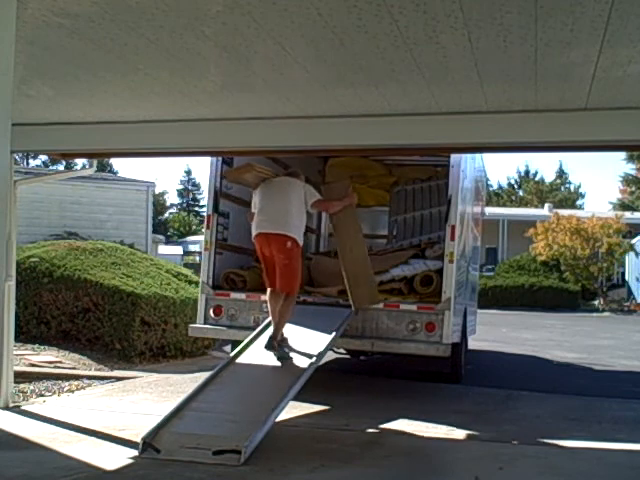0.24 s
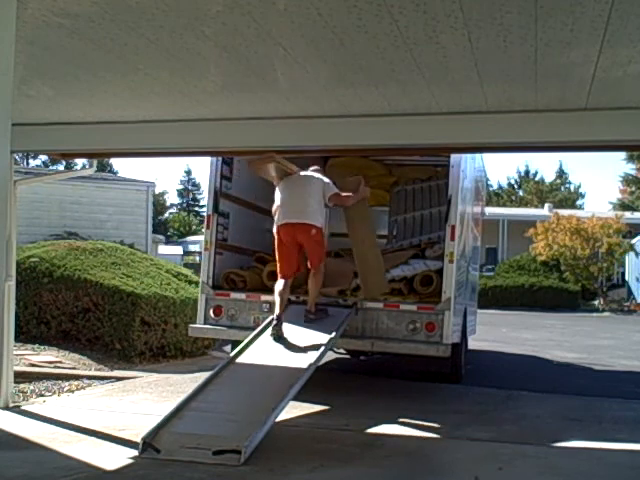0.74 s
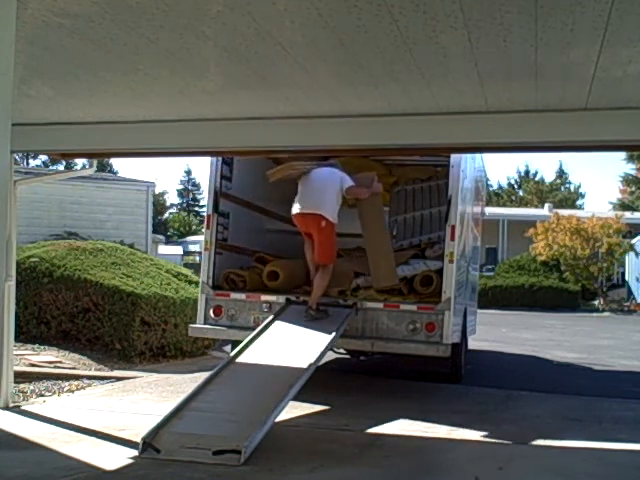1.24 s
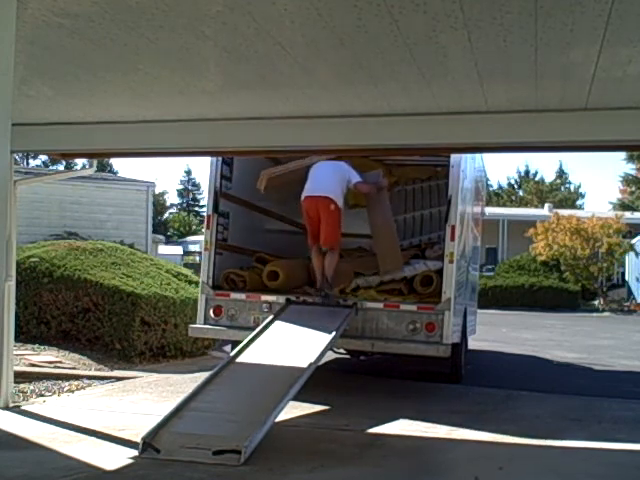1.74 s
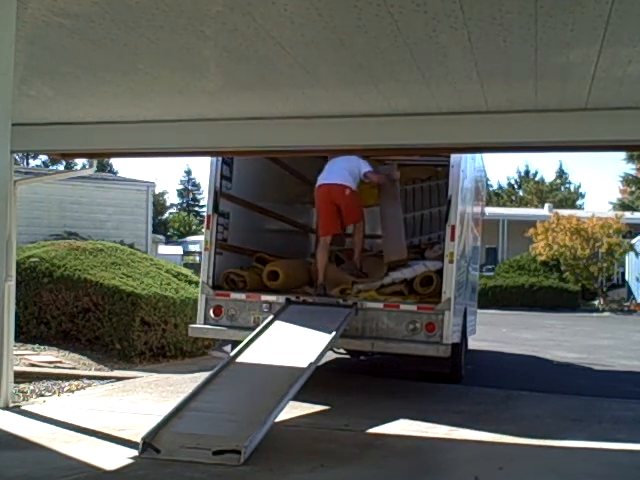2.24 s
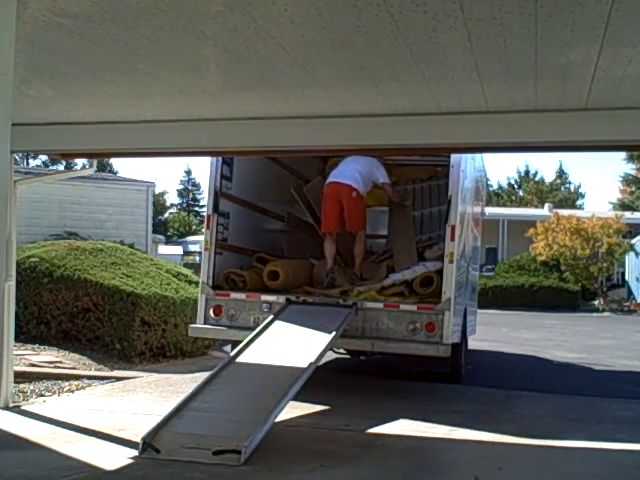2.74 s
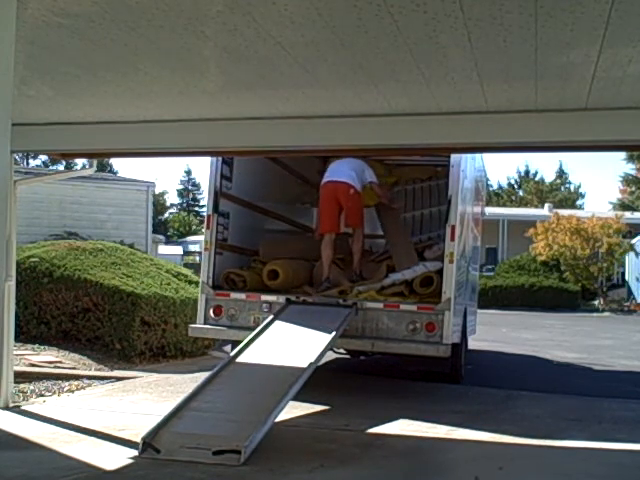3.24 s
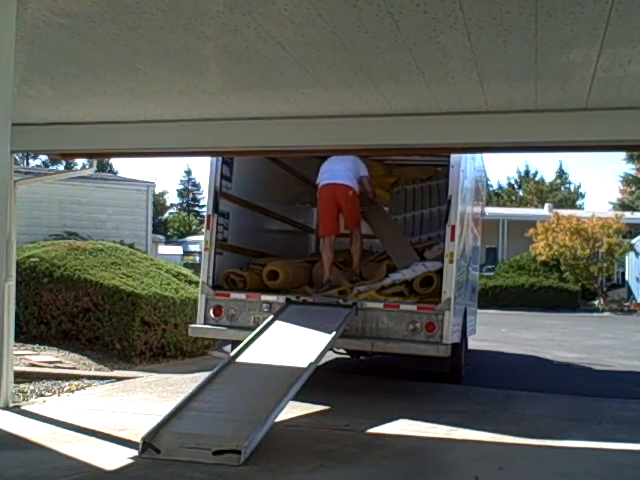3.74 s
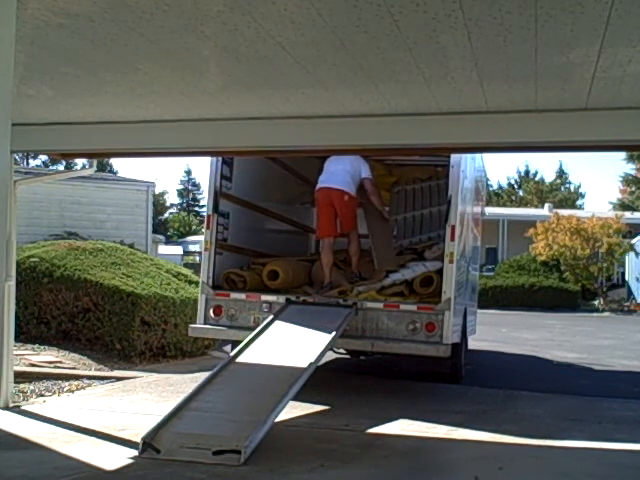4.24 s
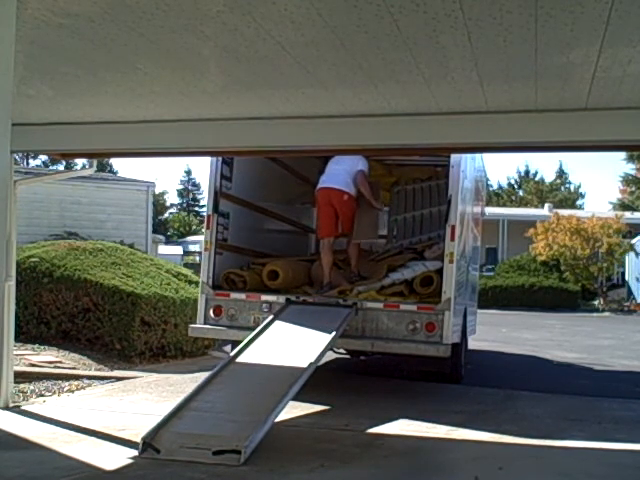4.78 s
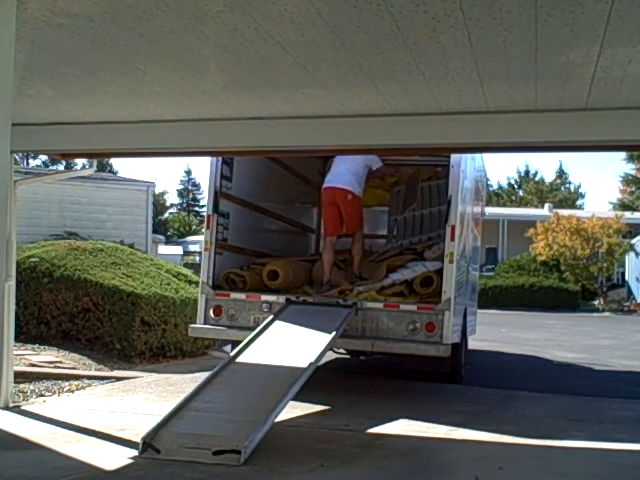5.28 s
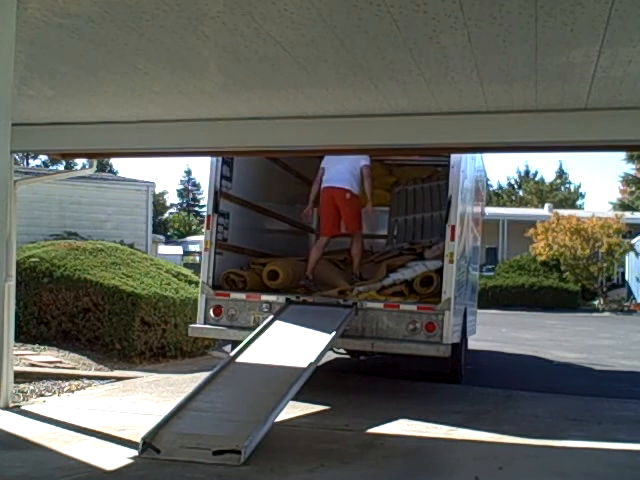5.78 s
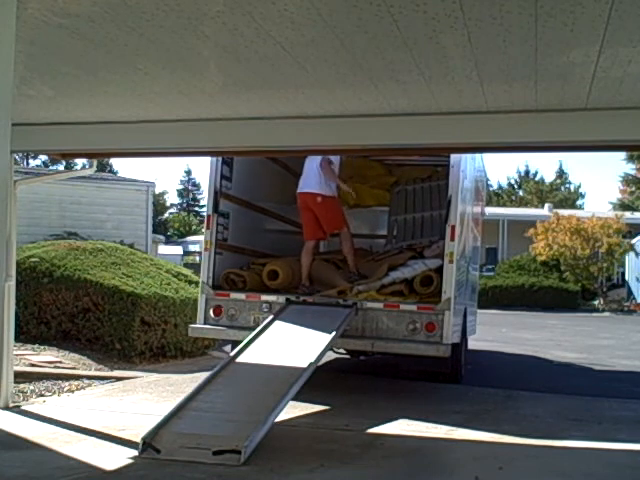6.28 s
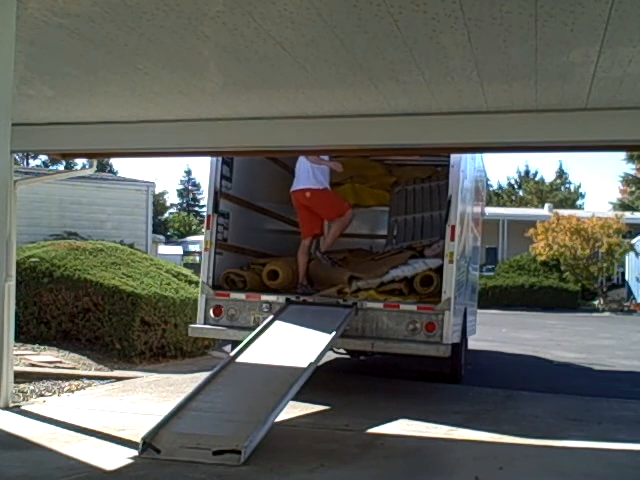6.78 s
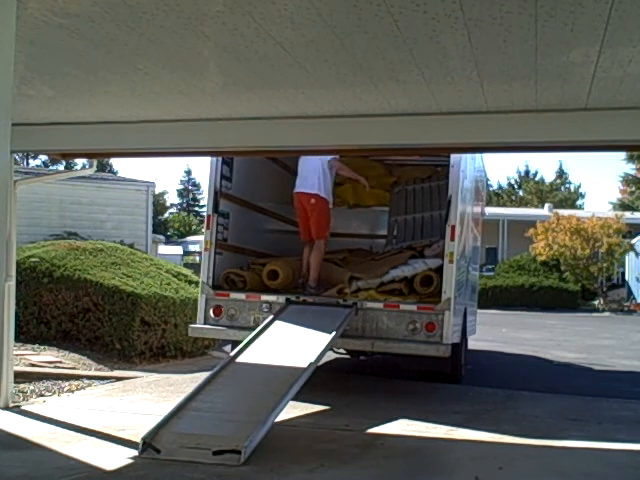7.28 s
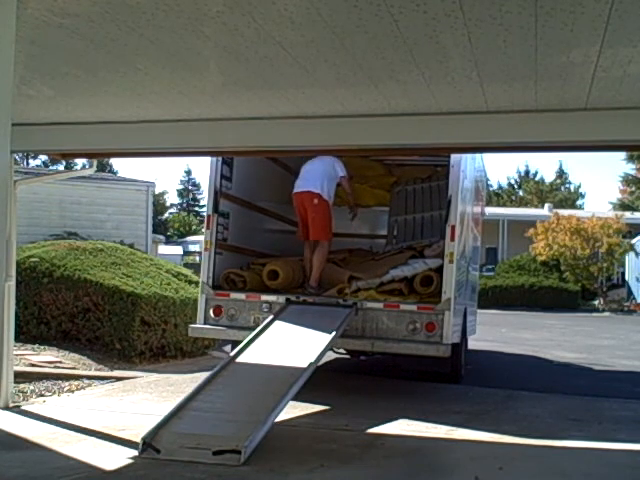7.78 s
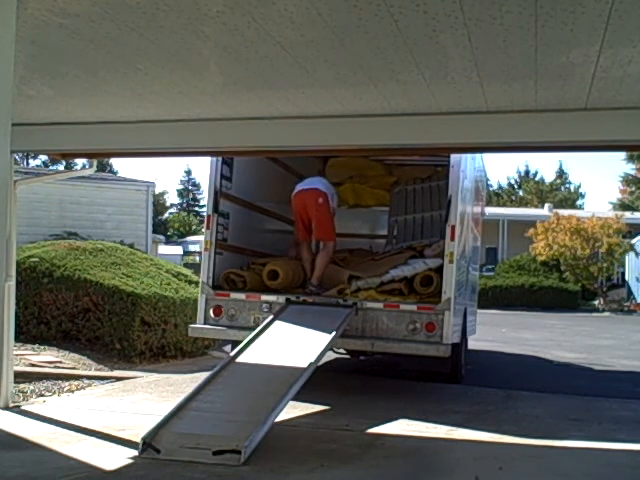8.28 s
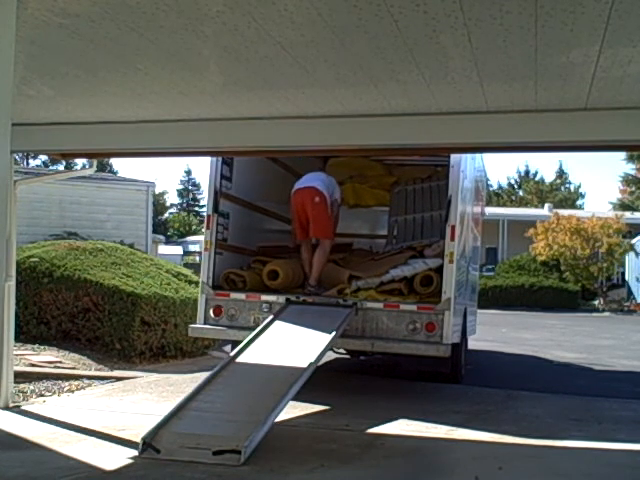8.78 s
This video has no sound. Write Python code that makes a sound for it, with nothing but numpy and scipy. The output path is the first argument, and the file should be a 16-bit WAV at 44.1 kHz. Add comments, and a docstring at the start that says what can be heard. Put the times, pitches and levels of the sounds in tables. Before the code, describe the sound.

A low, slightly wavering rumble of distant traffic runs throughout, coloured by the garage. At 0.1-0.35 s a sole squeaks faintly on a metal ramp, followed by gritty scuffs and small knocks around 0.7. Deep floor thumps come at 1.1 and 1.4, with light ticks of carried boards between 1.25 and 1.6, then more thuds near 1.85. From 2.2 boards tumble, peaking in a loud clattering crash at 2.45, with hollow knocks at 2.7. Another hard knock and booming clatter hit at 3.0-3.2, with fading knocks to 3.45 and a double knock at 3.8. After a lull, a sharp crack snaps at 4.68. At 5.5-5.7 comes the loudest crash, bright, dense and slightly overloaded, ringing in the box. Smaller cracks follow at 6.0, 6.2 and 6.45 with a light tumble. Soft scuffs and a tick at 7.5-7.8 and a faint rub at 8.6 end it.

```python
"""Boards thrown onto a heap of scrap wood in a box truck, with the microphone in the garage.
Boards knock with a bending mode, slats crack, and the heap tumbles in rushes of small impacts.
The floor booms through paired modes; shoes scuff and squeak as a man walks up the ramp.
Each wooden blow, scuff and tick gets the cargo box's ring and the garage's echo, made of decaying noise.
Distant traffic rumbles outside as coloured noise, and a soft overload squashes the loudest crashes."""
import sys
import numpy as np
from scipy import signal
from scipy.fft import rfft, irfft
from scipy.io import wavfile
from scipy.ndimage import uniform_filter1d

SR = 44100
rng = np.random.default_rng(int(sys.argv[2]) if len(sys.argv) > 2 else 0)


def generate_wav(sig):
    """Save sig (samples, or channels by samples) to the path in sys.argv[1] as 16-bit PCM at SR."""
    pcm = np.round(np.clip(np.atleast_2d(sig).T, -1, 1) * 32767).astype(np.int16)
    wavfile.write(sys.argv[1], SR, pcm)


N = 397782
SIZE = 32768  # samples in one event
T = np.arange(SIZE) / SR
HZ = np.fft.rfftfreq(SIZE, 1 / SR)

# Event levels are the rms of the loudest 20 ms, in dB re full scale ahead of the overload.
# Brightness is the corner above which a contact loses treble.

# Traffic spectrum heard from the garage. Each row: frequency in Hz, relative density in dB per Hz.
STREET_SPECTRUM = [(12, -17), (22, -2), (58, -2.5), (98, -9.5), (146, -5), (250, -11.5), (340, -16),
                   (446, -14.5), (530, -21), (750, -28), (1030, -29.5), (1220, -30.5), (1570, -36.5),
                   (3000, -42.5), (7000, -49.5), (16000, -57.5)]
# Garage resonances and faint hums. Each row: frequency in Hz, width in Hz, lift in dB.
GARAGE_MODES = [(137, 12, 2.5), (181, 69, 2.5), (283, 15, 1), (367, 38, 5), (452, 5.4, 7), (617, 44, 7.5),
                (722.4, 12, 10.5), (836, 27, 10.5), (950, 51, 6), (980, 16, 1), (1153, 14, 11),
                (1304, 6.1, 12.5), (1795, 9.8, 10.5), (2185, 14, 10.5)]
STREET_DB = -40  # rms level about which the rumble wavers

# Cargo box wall resonances. Each row: frequency in Hz, width in Hz, lift in dB (sign ignored).
WALL_MODES = [(304, 30, 0), (440, 25, 4.5), (1150, 97, 3), (1370, 47, 3), (2090, 21, 0), (2390, 160, 3.5),
              (4050, 510, 2), (5420, 40, 4.5), (6730, 61, -1), (8440, 42, 2)]
# Late die-away inside the cargo box. Each row: frequency in Hz, time to fall 60 dB in seconds.
BOX_T60 = [(100, 0.95), (400, 0.65), (1040, 0.47), (2760, 0.5), (7300, 0.39), (15000, 0.16)]

# A sole drags and squeaks on the ramp. Each row: time in seconds, rms level in dB.
SQUEAK_LEVELS = [(0.10, -74), (0.15, -61), (0.22, -53), (0.26, -55.5), (0.36, -74)]
# Resonances of the squeak. Each row: frequency in Hz, width in Hz, relative level in dB.
SQUEAK_MODES = [(1570, 110, 3.5), (2980, 290, -12), (3760, 250, -13), (4630, 220, -17), (7100, 200, -20),
                (7760, 750, -17.5)]

# Shoes and boards rub over grit. Each row: start in seconds, swell in seconds, level in dB.
SCUFFS = [(0.270, 0.0088, -53.5), (0.690, 0.13, -57), (1.085, 0.011, -55), (1.390, 0.017, -53.5),
          (1.490, 0.021, -59), (1.760, 0.017, -58.5), (2.146, 0.024, -50.5), (4.050, 0.045, -58),
          (5.130, 0.05, -59), (7.525, 0.0384, -60), (7.640, 0.093, -56.5), (8.580, 0.14, -56)]
# Spectrum of rubbed grit. Each row: frequency in Hz, relative level in dB.
GRIT_SPECTRUM = [(100, -20.5), (700, -8), (1500, 6), (3000, -1), (7000, 0.5), (16000, -0.5)]
SCUFF_T60, SCUFF_HZ = 0.6, 6100  # die-away in s, brightness

# Short dry ticks, some from small things, some the sharp edge of a wooden blow.
# Each row: start in seconds, level in dB, brightness in Hz.
TICKS = [(0.273, -49.5, 6950), (0.760, -48, 4000), (0.793, -51.5, 7000), (1.428, -49, 2700),
         (1.609, -49, 4670), (1.695, -46, 8500), (1.932, -51, 7010), (4.339, -54.5, 7000),
         (4.682, -34.5, 8000), (6.214, -40, 12080), (7.690, -54.5, 7000), (7.802, -43, 3850)]
TICK_MODE_SHARE, TICK_LIFT_DB = 0.65, 5.5  # brighter ticks ring higher: mode as a share of brightness
# Carried boards tick against one another on the way in; the run swells to its middle.
CARRY_FROM_S, CARRY_TO_S = 1.24, 1.57
CARRY_DB, CARRY_ENDS_DB, CARRY_SPREAD_DB = -51, -6, 1.2  # middle, ends against it, random spread
CARRY_HZ, CARRY_SCATTER, CARRY_LIFT_DB = 1900, 0.13, 20  # brightness and typical mode, log pitch spread, lift

# Low thuds and booms of the floor, some overlapping.
# Each row: start in seconds, level in dB, most driven pitch in Hz.
THUDS = [(0.185, -39.5, 316), (1.070, -37, 190), (1.108, -28, 36.5), (1.398, -35, 43.5), (1.410, -38, 210),
         (1.519, -34.5, 42.6), (1.833, -27, 185), (1.842, -40, 470), (1.924, -29, 208), (1.995, -33.5, 175),
         (2.411, -27, 170), (2.462, -21.5, 440), (2.473, -23.5, 249.4), (3.053, -26, 168),
         (3.069, -25.5, 62), (3.121, -23, 199), (3.167, -26, 65.4), (5.617, -33, 70), (5.630, -27.5, 160.8)]
# Truck floor modes before pairing and detuning. Each row: frequency in Hz, relative drive in dB.
FLOOR_MODES = [(31, 1), (39, 3.5), (52, -7), (62, -1), (78, -4), (98, -1), (120, 1.5), (150, -1), (174, 0),
               (203, -3), (242, -2), (282, -9), (305, 2), (335, -2.5), (372, -5.5), (424, 0), (450, -3.5),
               (495, -9), (545, 0), (600, -1)]
FLOOR_LAG_S = 0.006  # the floor answers just after the blow
FLOOR_T60, FLOOR_T60_SLOPE = 0.57, -0.47  # ring at 100 Hz in s; power of pitch that shortens higher thuds
HEAVY_HZ, FLOOR_DB_PER_OCTAVE = 1220, -21.5  # a knock this dull shakes the floor at its own level; brighter, less
KNOCK_FLOOR_HZ, TUMBLE_FLOOR_HZ, TUMBLE_FLOOR_DB = 401, 350, -14  # most driven pitches; floor against heap level

# The heap gives way in rushes of small impacts. Each row: start in seconds, swell in seconds,
# time to fall 60 dB in seconds, level in dB, brightness in Hz.
TUMBLES = [(2.255, 0.047, 0.45, -24, 4170), (2.424, 0.026, 0.12, -15, 6800),
           (2.456, 0.011, 0.36, -14, 4440), (3.005, 0.0092, 0.53, -32.5, 4270),
           (3.109, 0.018, 0.44, -30.5, 4930), (5.514, 0.012, 0.31, -24.5, 5506),
           (5.616, 0.024, 0.19, -9.5, 6930), (5.660, 0.018, 0.24, -12.5, 9500),
           (6.446, 0.052, 0.27, -32, 5050)]
# Spectrum of the heap. Each row: frequency in Hz, relative level in dB.
HEAP_SPECTRUM = [(60, -14.5), (200, -6.5), (450, -4.5), (700, -11), (900, -0.5), (1200, -0.5), (1800, -3),
                 (2500, -3), (5000, -3.5), (9500, -2.5), (13000, -4.5), (16000, -8.5)]
# Settling after each rush: delay, swell and die-away in s; level against the rush; brightness.
SETTLE_AFTER_S, SETTLE_SWELL_S, SETTLE_T60 = 0.14, 0.035, 0.81
SETTLE_DB, SETTLE_HZ = -26, 5600

# A thin slat snaps or is slapped. Each row: start in seconds, level in dB, brightness in Hz,
# lift of its mode in dB (sign ignored).
CRACKS = [(2.217, -33.5, 3600, 11.5), (2.28, -32, 4000, 10.5), (2.412, -25.5, 4500, 4.5),
          (2.444, -20, 7000, 8.5), (2.525, -30, 4480, 5.5), (2.904, -33.5, 5070, 4.5),
          (3.002, -25, 4000, 22), (3.117, -30, 5500, 8), (3.327, -31.5, 8500, 6), (3.782, -38, 4000, 9),
          (4.662, -44, 4000, 5), (4.677, -31, 6500, 13), (4.712, -39, 4430, 4), (4.752, -37.5, 3930, 7),
          (5.514, -34, 5500, 1.5), (5.620, -21.5, 4500, 0.5), (5.645, -11.5, 5000, 10.5),
          (5.690, -8.5, 9040, -0.5), (5.973, -40, 3460, 11), (6.021, -27.5, 6640, 5.5),
          (6.165, -39.5, 7980, 0), (6.213, -31.5, 5300, 0), (6.399, -41, 4500, 1), (6.444, -36, 9130, 7)]
# Spectrum of a slat. Each row: frequency in Hz, relative level in dB.
SLAT_SPECTRUM = [(60, -25), (400, -12), (700, -21), (1050, 0), (1800, -3.5), (2500, 0.5), (5000, -1),
                 (10000, -3), (16000, -7)]
SLAT_HZ = 2400  # the slats share one main mode

# A board knocks. Each row: start in seconds, level in dB, brightness in Hz, main bending mode in Hz.
KNOCKS = [(0.706, -53.5, 1700, 1300), (0.735, -45, 1230, 1140), (1.818, -37.5, 1290, 1140),
          (1.893, -37, 1150, 1110), (2.233, -33.5, 2720, 1320), (2.401, -26.5, 1930, 990),
          (2.675, -22.5, 1830, 934), (2.747, -22.5, 2240, 1550), (2.992, -26, 1710, 1050),
          (3.000, -19, 2110, 1100), (3.159, -23, 1580, 1170), (3.294, -31.5, 1260, 1090),
          (3.428, -37.5, 1240, 1026), (3.762, -24.5, 2260, 990), (3.826, -31.5, 2060, 1240),
          (3.948, -45, 1400, 860), (4.041, -50.5, 1890, 1110), (4.677, -30, 3000, 1010),
          (5.887, -37, 2900, 2320), (6.125, -41, 2420, 1245), (6.485, -30.5, 3120, 1100),
          (7.808, -55, 2290, 1570)]
# Spectrum of a board. Each row: frequency in Hz, relative level in dB.
BOARD_SPECTRUM = [(60, -19), (250, -8.5), (450, -11.5), (700, -10.5), (860, 2), (1600, -1.5), (2700, 0.5),
                  (4000, -3.5), (8000, -3), (16000, -4.5)]
BOARD_LIFT_DB = 7  # how far the bending mode stands out
SECOND_AFTER_S, SECOND_MODE = 0.019, 1.4  # a second knock follows: delay, ratio of the mode it excites
# Second knock against the first at a medium level; each dB harder weakens it further.
SECOND_DB, MEDIUM_KNOCK_DB, SECOND_PER_DB = -5, -31, -0.34

EDGE_HZ = 15950  # upper band limit


def amp(db):
    """Decibels to gain."""
    return 10 ** (np.asarray(db) / 20)


def read(points, hz):
    """Reads a table of (Hz, value) along a log-frequency axis."""
    f, value = np.transpose(points)
    return np.interp(np.log(hz + 1), np.log(f + 1), value)


def add(mix, s, sound):
    """Mixes a sound in at a time in seconds."""
    part = mix[max(round(s * SR), 0):][:len(sound)]
    part += sound[:len(part)]


def lifts(modes, hz):
    """Gain of a set of resonances standing over a flat base."""
    power = 1
    for f, width, db in modes:
        power = power + (amp(abs(db)) ** 2 - 1) / (1 + (2 * (hz - f) / width) ** 2)
    return np.sqrt(power)


def contact(bright_hz):
    """A contact of finite length pushes little above its brightness."""
    return 1 / np.sqrt(1 + (HZ / bright_hz) ** 4)


def ring(gain):
    """Causal impulse response with the given magnitude, by folding the cepstrum (minimum phase)."""
    cepstrum = irfft(np.log(np.maximum(gain, 1e-5)))
    cepstrum[1:SIZE // 2] *= 2
    cepstrum[SIZE // 2 + 1:] = 0
    return irfft(np.exp(rfft(cepstrum)))


def at_level(x, db, size=900):
    """Scales a sound so that its loudest 20 ms have the given rms."""
    return x * amp(db) / np.sqrt(uniform_filter1d(x ** 2, size).max())


def cargo_box(direct_db, late_db, early_t60, echo_s=0.076, echo_db=-6, count=8):
    """Response from one spot in the box: direct sound, wall slaps, a dense tail and the garage's echo."""
    hz, t, noise = signal.stft(rng.standard_normal(SIZE), SR, nperseg=256)
    early = amp(-60 * t / early_t60)
    late = amp(late_db - 60 * t / read(BOX_T60, hz)[:, None])
    echo = amp(late_db + echo_db - 60 * abs(t - echo_s) / early_t60) * (t > echo_s)
    echo = echo / np.hypot(1, hz / 5000)[:, None]  # the echo comes back duller
    envelope = np.sqrt(early ** 2 + late ** 2 + echo ** 2)
    response = signal.istft(noise * envelope, SR, nperseg=256)[1][:SIZE]
    response /= np.linalg.norm(response)
    slaps = (rng.uniform(.015, .15, count) * early_t60 * SR).astype(int) % SIZE
    response[slaps] += amp(direct_db) * rng.uniform(-1.2, 1, count) / 2
    response[0] += amp(direct_db)
    return response


def blows(rows, spectrum, mode_q, direct_db, late_db, early_t60,
          chatter_db, chatter_s, rattle_db, rattle_s=0.064, count=4):
    """A piece hits, chatters as its length settles, rattles its neighbours and rings with its own mode."""
    out = np.zeros(N)
    body = amp(read(spectrum, HZ)) * lifts(WALL_MODES, HZ)
    for s, db, bright_hz, mode_hz, mode_db in rows:
        soon, later = rng.random((2, count))
        force = np.zeros(SIZE)
        force[(soon * chatter_s * SR).astype(int)] = amp(chatter_db) * rng.uniform(-1, 1, count)
        rattle = amp(rattle_db) * (1 - later / 2) * rng.choice([-1, 1], count)
        force[(later * rattle_s * SR).astype(int)] += rattle
        force[0] = 1  # the blow itself
        mode = lifts([(mode_hz, mode_hz / mode_q, mode_db)], HZ)
        wood = ring(body * contact(bright_hz) * mode)
        box = cargo_box(direct_db, late_db, early_t60)
        sound = irfft(rfft(force) * rfft(wood) * rfft(box))
        add(out, s, at_level(sound, db))
    return out


def rushes(rows, spectrum, per_s, spread_db, start_db, direct_db, late_db, early_t60, count=2):
    """Many small impacts of uneven size, at different spots, swell to a peak and die away."""
    out = np.zeros(N)
    body = amp(read(spectrum, HZ)) * lifts(WALL_MODES, HZ)
    for s, swell, t60, db, bright_hz in rows:
        effort = amp(np.where(T < swell, start_db * (1 - T / swell), -60 * (T - swell) / t60))
        colour = rfft(ring(body * contact(bright_hz)))
        sound = 0
        for spot in range(count):
            sizes = amp(spread_db * np.minimum(rng.exponential(1, SIZE), 3)) * rng.choice([-1, 1], SIZE)
            hits = rng.random(SIZE) < per_s / count / SR
            response = irfft(colour * rfft(cargo_box(direct_db, late_db, early_t60)))
            sound = sound + signal.fftconvolve(effort * sizes * hits, response)[:SIZE]
        add(out, s, at_level(sound, db))
    return out


def street(waver_db=0.6, size=6000):
    """Distant traffic and faint hums: noise coloured by the garage, slowly wavering in level."""
    hz = np.fft.rfftfreq(N, 1 / SR)
    colour = amp(read(STREET_SPECTRUM, hz)) * lifts(GARAGE_MODES, hz)
    rumble = irfft(rfft(rng.standard_normal(N)) * colour, N)
    waver = uniform_filter1d(uniform_filter1d(rng.standard_normal(N), size), size)
    return amp(STREET_DB + waver_db * waver / waver.std()) * rumble / rumble.std()


def squeak(wander=0.028, count=6):
    """Rubber slipping on aluminium: overlaid noises through narrow resonances, each set slightly retuned."""
    sound = 0
    for slip in range(count):
        pitch = 1 + wander * rng.standard_normal()
        peaks = 0
        for hz, width, db in SQUEAK_MODES:
            peaks = peaks + amp(db) / (1 + (2 * (HZ - hz * pitch) / width) ** 2)
        sound = sound + irfft(rfft(rng.standard_normal(SIZE)) * peaks)
    s, db = np.transpose(SQUEAK_LEVELS)
    envelope = np.interp(s[0] + T, s, amp(db), right=0)
    out = np.zeros(N)
    add(out, s[0], sound / sound.std() * envelope)
    return out


def scuffs():
    """Shoes and boards crush grit in dense tiny impacts that share one colour and die-away."""
    rows = [(s, swell, SCUFF_T60, db, SCUFF_HZ) for s, swell, db in SCUFFS]
    return rushes(rows, GRIT_SPECTRUM, per_s=1100, spread_db=4.0, start_db=-6.5,
                  direct_db=-11, late_db=-10, early_t60=0.091)


def carried_ticks(count=9):
    """Rows for an uneven run of ticks from the carried boards, loudest in the middle."""
    progress = (np.arange(count) + rng.random(count)) / count
    force, pitch = rng.standard_normal((2, count))
    times = CARRY_FROM_S + (CARRY_TO_S - CARRY_FROM_S) * progress
    levels = CARRY_DB + CARRY_ENDS_DB * abs(2 * progress - 1) + CARRY_SPREAD_DB * force
    modes = CARRY_HZ * np.exp(CARRY_SCATTER * pitch)
    return [(s, db, CARRY_HZ, hz, CARRY_LIFT_DB) for s, db, hz in zip(times, levels, modes)]


def ticks():
    """Short dry ticks, and those of the carried boards: blows with a ringing mode and little reverberation."""
    dry_ticks = [(s, db, bright_hz, bright_hz * TICK_MODE_SHARE, TICK_LIFT_DB) for s, db, bright_hz in TICKS]
    return blows(dry_ticks + carried_ticks(), SLAT_SPECTRUM, mode_q=10, direct_db=-7, late_db=-17,
                 early_t60=.055, chatter_db=-6, chatter_s=.006, rattle_db=-20)


def floor_loads():
    """Rows for the floor's thuds and for its answers to knocks and tumbles; low booms last longest."""
    loads = list(THUDS)
    for s, db, bright_hz, mode_hz in KNOCKS:
        floor_db = db + FLOOR_DB_PER_OCTAVE * np.log2(bright_hz / HEAVY_HZ)
        loads.append((s + FLOOR_LAG_S, floor_db, KNOCK_FLOOR_HZ))
    for s, swell, t60, db, bright_hz in TUMBLES:
        loads.append((s + FLOOR_LAG_S, db + TUMBLE_FLOOR_DB, TUMBLE_FLOOR_HZ))
    return [(s, db, hz, FLOOR_T60 * (hz / 100) ** FLOOR_T60_SLOPE) for s, db, hz in loads]


def truck_floor(reach=0.34, split=0.029, rise_s=0.007, count=2):
    """Each row swings the floor's close pairs of modes, most of all those near its own pitch."""
    out = np.zeros(N)
    modes_hz, modes_db = np.repeat(FLOOR_MODES, count, 0).T[:, :, None]
    for s, db, hz, t60 in floor_loads():
        detune, phase = rng.standard_normal((2, len(modes_hz), 1))
        drive = amp(modes_db) / (1 + (np.log(modes_hz / hz) / reach) ** 2)
        cycles = modes_hz * (1 + split * detune) * T + phase
        swing = (drive * np.sin(2 * np.pi * cycles)).sum(0)
        envelope = (1 - np.exp(-T / rise_s)) * amp(-60 * T / t60)
        add(out, s, at_level(swing * envelope, db))
    return out


def settling():
    """Each rush of the heap is followed by a quieter, sparser rattle of loose pieces."""
    rows = [(s + SETTLE_AFTER_S, SETTLE_SWELL_S, SETTLE_T60, db + SETTLE_DB, SETTLE_HZ)
            for s, swell, t60, db, bright_hz in TUMBLES]
    return rushes(rows, HEAP_SPECTRUM, per_s=110, spread_db=3, start_db=-6,
                  direct_db=-4, late_db=-12, early_t60=0.12)


def heap():
    """The scrap heap gives way: many pieces collide at once, then the rush dies away."""
    return rushes(TUMBLES, HEAP_SPECTRUM, per_s=450, spread_db=2.0, start_db=-8.5,
                  direct_db=-6.0, late_db=-9.5, early_t60=.16)


def slats():
    """All slats ring at one pitch; a loose one rings out, a pinned one hardly at all."""
    rows = [(s, db, bright_hz, SLAT_HZ, lift_db) for s, db, bright_hz, lift_db in CRACKS]
    return blows(rows, SLAT_SPECTRUM, mode_q=6.9, direct_db=-14.5, late_db=-7, early_t60=0.17,
                 chatter_db=-6.0, chatter_s=.01, rattle_db=-16.5)


def boards():
    """Every knock is followed by a second; the harder the first, the weaker the second against it."""
    rows = []
    for s, db, bright_hz, mode_hz in KNOCKS:
        second_db = db + SECOND_DB + SECOND_PER_DB * (db - MEDIUM_KNOCK_DB)
        rows.append((s, db, bright_hz, mode_hz, BOARD_LIFT_DB))
        rows.append((s + SECOND_AFTER_S, second_db, bright_hz, mode_hz * SECOND_MODE, BOARD_LIFT_DB))
    return blows(rows, BOARD_SPECTRUM, mode_q=12.0, direct_db=-8.5, late_db=-6.0, early_t60=0.15,
                 chatter_db=-7.5, chatter_s=.012, rattle_db=-8.5)


def scene():
    """All the work in the truck over the street's rumble, as one channel."""
    background = street()
    ramp_and_floor = squeak() + scuffs() + truck_floor()
    wood = ticks() + settling() + heap() + slats() + boards()
    return (background + ramp_and_floor + wood)[None]


def record(dry):
    """The microphone signal: a soft overload squashes the loudest crashes, then the band is limited."""
    ceiling = .74
    squashed = dry / (1 + (dry / ceiling) ** 4) ** (1 / 4)
    band = signal.firwin(511, EDGE_HZ, window=("kaiser", 9), fs=SR)
    return signal.oaconvolve(squashed, band[None], "same")


dry = scene()
out = record(dry)
generate_wav(out)
```